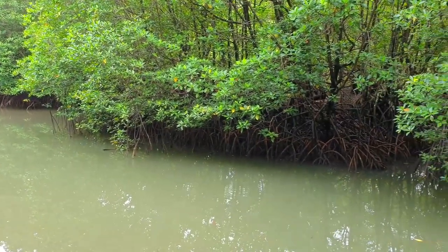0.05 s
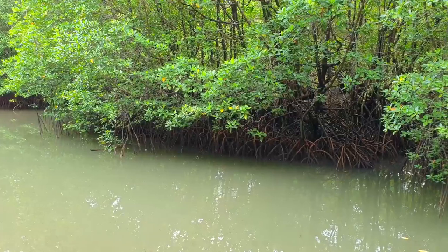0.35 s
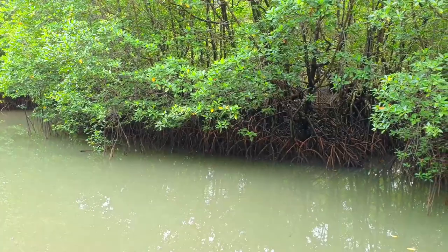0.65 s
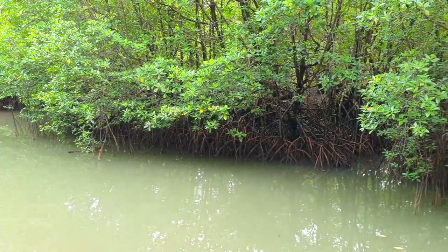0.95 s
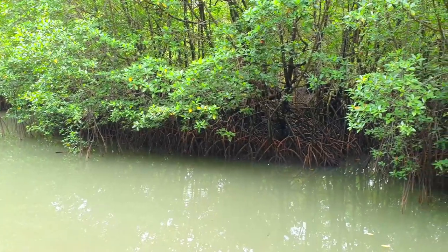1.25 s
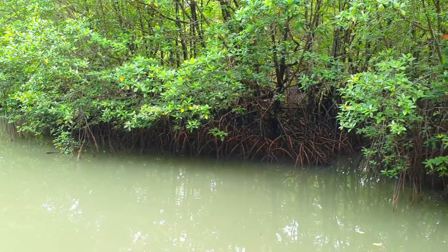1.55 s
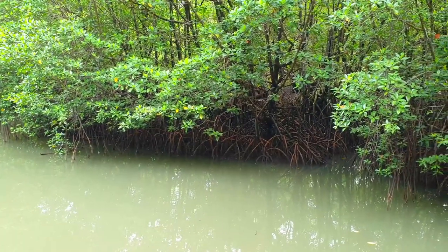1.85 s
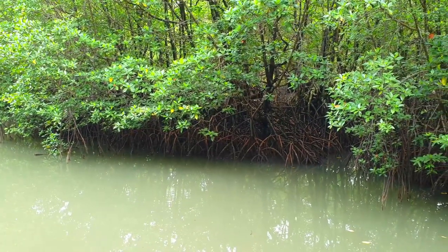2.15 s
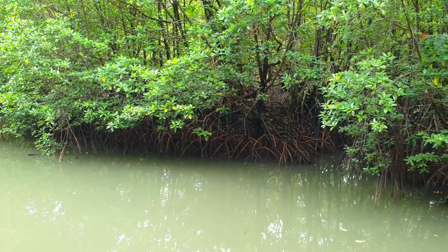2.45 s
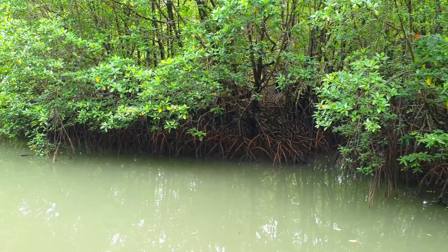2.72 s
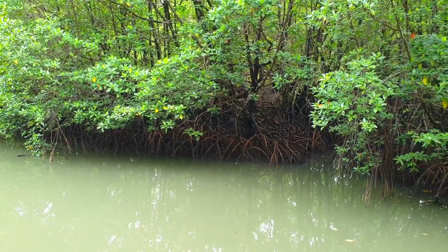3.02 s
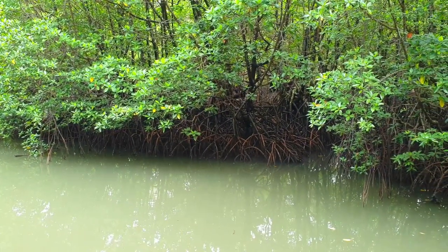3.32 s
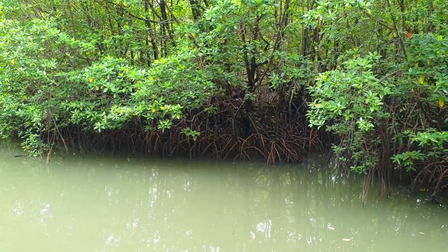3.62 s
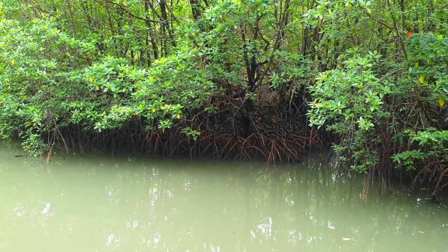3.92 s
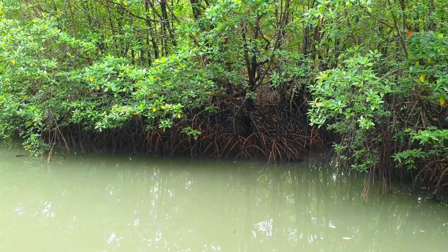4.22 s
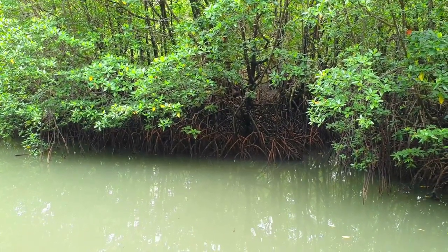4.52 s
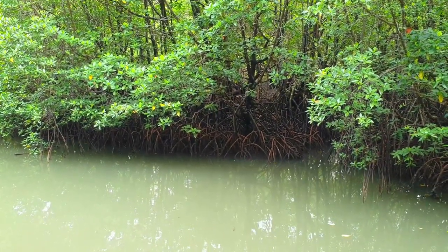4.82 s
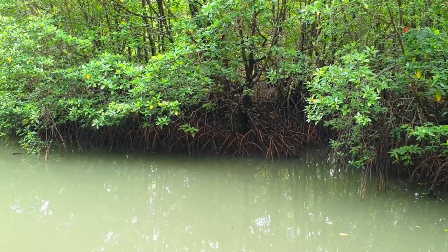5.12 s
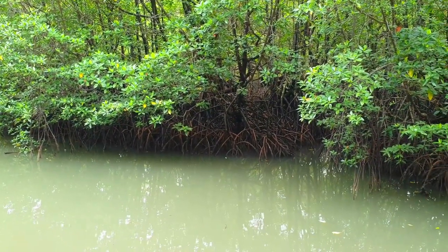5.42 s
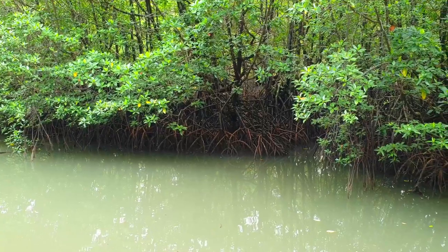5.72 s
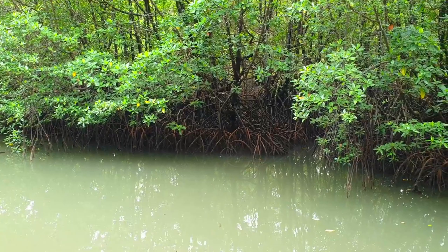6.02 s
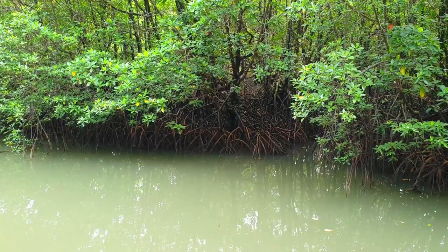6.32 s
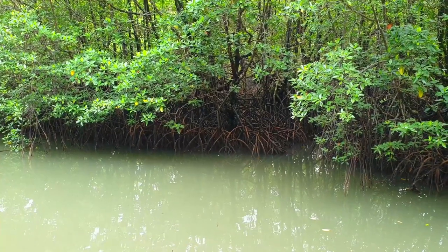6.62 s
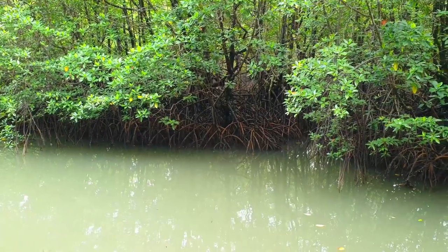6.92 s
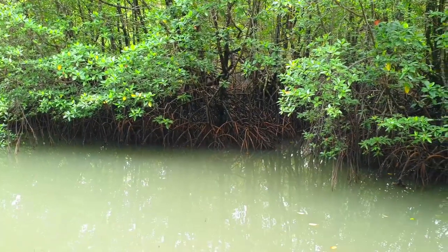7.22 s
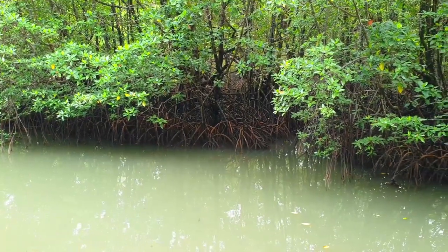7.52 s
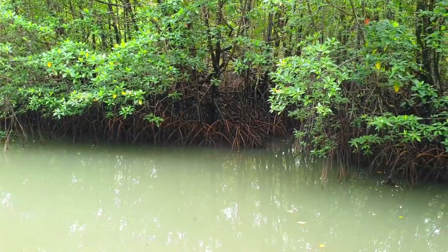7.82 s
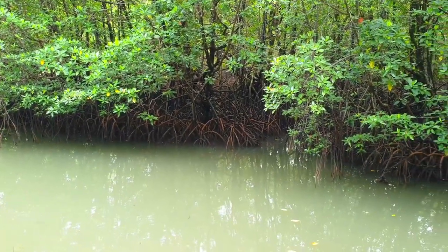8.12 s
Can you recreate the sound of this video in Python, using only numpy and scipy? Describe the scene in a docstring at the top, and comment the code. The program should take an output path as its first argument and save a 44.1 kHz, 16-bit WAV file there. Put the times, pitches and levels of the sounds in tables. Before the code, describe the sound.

A shrill, unbroken cicada buzz fills a mangrove forest over a faint far-off engine rumble and one soft wooden knock.

```python
"""Cicadas drone in a mangrove forest beside a still creek. Each one clicks a small drum skin (its tymbal)
so fast that its hollow belly rings, and the trees scatter the sound. Five sing nearby over a far chorus.
Underneath, a distant engine gathers speed and the forest air murmurs. Wood knocks softly once, the water
plops once, something rustles twice, and two thin whistles sound far away near the end."""
import sys
import numpy as np
from scipy import signal
from scipy.fft import rfft, irfft, next_fast_len
from scipy.io import wavfile
from scipy.ndimage import map_coordinates

SR = 44100
rng = np.random.default_rng(int(sys.argv[2]) if len(sys.argv) > 2 else 0)


def persist_wave(psi):
    """Save psi, clipped to +-1, as 16-bit WAV."""
    counts = np.round(np.clip(psi, -1, 1) * 32767).astype(np.int16)
    wavfile.write(sys.argv[1], SR, np.atleast_2d(counts).T)


N = 368235
TIME = np.arange(N) / SR


def amp(db):
    """Turn decibels into a gain."""
    return np.exp(np.asarray(db) * np.log(10) / 20)


def unit(x):
    """Scale a sound to an average strength (rms) of 1."""
    return x / np.sqrt(np.mean(x ** 2) + 1e-20)


def along(points, hz):
    """Read a table by frequency, on a log scale."""
    f, values = np.transpose(points)
    return np.interp(np.log(hz + 1), np.log(f + 1), values)


def curves(rows):
    """Read a table by time: one value per sample for each later column."""
    times, *columns = np.transpose(rows)
    return [np.interp(TIME, times, column) for column in columns]


def wobble(rate):
    """A smooth curve through rate random values a second."""
    return map_coordinates(rng.standard_normal(int(N * rate / SR) + 4), [TIME * rate])


def filtered(x, response):
    """Multiply each frequency in x by response(hz)."""
    size = next_fast_len(N + SR // 2)
    return irfft(rfft(x, size) * response(np.fft.rfftfreq(size, 1 / SR)), size)[..., :N]


def panned(x, left_db):
    """Make the left side left_db louder than the right."""
    return x * amp(np.array([[left_db], [-left_db]]) / 2)


# how alike the two ears hear the noise: f/Hz, likeness (1 = the same)
EAR_LIKENESS = [(60, 0.71), (130, 0.91), (290, 0.8), (640, 0.68), (1400, -0.38), (3000, 0.018)]

def rush(spectrum):
    """Noise from all around: alike in both ears in the bass, unrelated in the treble."""
    def response(hz):
        angle = np.arccos(np.clip(along(EAR_LIKENESS, hz), -1, 1)) / 2
        return amp(along(spectrum, hz)) * [np.cos(angle), np.sin(angle)]
    mid, side = filtered(rng.standard_normal((2, N)), response)
    return unit(np.array([mid + side, mid - side]))


def clicks(cycles, uneven_db, reach=8):
    """The drum skin snaps once per cycle, each click a slightly different size."""
    at = np.interp(np.arange(np.ceil(cycles[0]), cycles[-1]), cycles, np.arange(N))
    taps = at.astype(int)[:, None] + np.arange(1 - reach, reach + 1)
    offset = taps - at[:, None]
    size = amp(uneven_db * rng.uniform(-1.07, 1, (len(at), 1)))
    shapes = size * np.sinc(offset) * np.sinc(offset / reach)  # lets a click fall between samples
    return np.bincount(np.clip(taps, 0, N - 1).ravel(), shapes.ravel(), N)


# how strongly a cicada's belly rings: f/Hz, relative level/dB
BELLY_RING = [(2350, -48.5), (4000, -42), (4620, -45.5), (4750, -33), (5060, -19.5), (5290, -10),
              (5920, 2.5), (6730, -9), (6950, -14.5), (7570, -20.5), (8790, -28.5), (9840, -27.5),
              (11000, -38.5), (12300, -32.5), (13200, -58), (14400, -48)]

def belly(pulses, shift_hz):
    """Clicks ring the hollow belly; a smaller insect rings higher."""
    return filtered(pulses, lambda hz: amp(along(BELLY_RING, np.abs(hz - shift_hz))))


def forest(x, lag_ms, echo_db, fade_s=0.37):
    """Direct sound, lag_ms late at the left ear, plus echoes that shift as the leaves sway."""
    t = np.arange(SR // 2) / SR
    tails = rng.standard_normal((4, len(t))) * amp(-60 * t / fade_s)
    padded = np.pad(x, (len(t) - 1, 0), mode="reflect")
    paths = signal.fftconvolve(padded[None], tails, "valid", axes=1)
    sway = wobble(1.3)
    echoes = np.cos(sway) * paths[:2] + np.sin(sway) * paths[2:]
    direct = filtered(x, lambda hz: np.exp(np.pi * hz * lag_ms / 1000 * np.array([[-1j], [1j]])))
    return unit(unit(direct) + amp(echo_db) * unit(echoes))


def buzzer(pace, db, shift_hz, throb_hz, throb_db, swing, jitter, lag_ms, echo_db):
    """A cicada whose fast clicks swell and hurry with each uneven throb of its muscles."""
    beat = 2 * np.pi * np.cumsum(throb_hz * (1 + 0.035 * wobble(8))) / SR
    squeeze = np.sin(beat) + 0.5 * np.sin(2 * beat)  # lopsided: one stroke is quicker than the other
    throb = squeeze * (1 + 0.28 * np.tanh(wobble(20)))
    hurry = 1 + swing * throb + jitter * wobble(90) + 0.0008 * wobble(4)
    pulses = clicks(np.cumsum(pace * hurry) / SR, uneven_db=6) * amp(throb_db * throb)
    return amp(db) * forest(belly(pulses, shift_hz), lag_ms, echo_db)


def rattler(pace, rebound, shift_hz, lag_ms, echo_db):
    """A slower, very even cicada: its drum skin pops in, then back out half a cycle later."""
    cycles = np.cumsum(pace * (1 + 0.0004 * wobble(25))) / SR
    pulses = clicks(cycles, uneven_db=0.5) - rebound * clicks(cycles + 0.5, uneven_db=1.5)
    return forest(belly(pulses, shift_hz), lag_ms, echo_db)


# the leading cicada's song: t/s, pace/(clicks per s), relative level/dB
LEADER_SONG = [(0, 597, -28), (1.3, 599, -26.5), (2.1, 595, -23.5), (3.1, 593, -24), (4.6, 590, -23),
               (5.8, 588, -24.5), (7, 587.8, -27), (8.35, 587.6, -27.5)]

def leading_cicada():
    """The main singer, whose clicks gradually slow down."""
    pace, db = curves(LEADER_SONG)
    return buzzer(pace, db, shift_hz=0, throb_hz=22.23, throb_db=3,
                  swing=0.002, jitter=0.001104, lag_ms=0.28, echo_db=1.5)


# its companion's song: t/s, pace/(clicks per s), relative level/dB
COMPANION_SONG = [(0, 600, -28.5), (1.4, 602, -26), (2.5, 604, -29), (4.2, 604, -30), (5.3, 602, -31),
                  (6.3, 602.5, -28), (6.9, 600, -30.5), (8.35, 602, -29)]

def companion_cicada():
    """Sings almost in step with the leader, so the two pulse against each other."""
    pace, db = curves(COMPANION_SONG)
    return buzzer(pace, db - 1.5, shift_hz=232, throb_hz=21.96, throb_db=2,
                  swing=0.0022, jitter=0.001, lag_ms=0.28, echo_db=4)


def deep_cicada(hold_s=0.35, fade_db_per_s=2.8):
    """A deeper singer that tires: it slows steadily and fades."""
    pace = 548 - 2.3 * TIME
    db = -24 - fade_db_per_s * np.maximum(TIME - hold_s, 0)
    return buzzer(pace, db, shift_hz=-270, throb_hz=20.55, throb_db=3,
                  swing=0.0036, jitter=0.001595, lag_ms=0.347, echo_db=6)


# the restless cicada's song: t/s, pace/(clicks per s), relative level/dB
RESTLESS_SONG = [(0, 447, -3), (1.1, 452, 1), (1.95, 455, 1), (2.2, 440, 2), (2.9, 442, 2), (3.8, 449, -3),
                 (4.7, 455, 1), (4.95, 442, 0), (5.5, 444, -1), (6.2, 462, -3)]

def restless_cicada():
    """Hurries its clicks, drops back and hurries again."""
    pace, db = curves(RESTLESS_SONG)
    return buzzer(pace, db - 27.5, shift_hz=90, throb_hz=23.2, throb_db=2.5,
                  swing=0.0038, jitter=0.001, lag_ms=-0.064, echo_db=1)


def shy_cicada(full_song_s=6.25):
    """Rattles quietly at first, then jumps into full song."""
    db = np.where(TIME > full_song_s, -24, -35.5)
    return amp(db) * rattler(pace=147, rebound=0.5, shift_hz=88, lag_ms=0.048, echo_db=6)


# the far chorus's loudness: t/s, relative level/dB
CHORUS_SWELL = [(0, -23.5), (1, -27), (3, -24), (5.3, -22.5), (7, -22.5), (8.35, -24)]

def far_chorus():
    """Countless far cicadas blend into a hiss; three stand out faintly."""
    db, = curves(CHORUS_SWELL)
    singers = 0
    for pace in rng.uniform(128, 165, 3):
        gain = amp(0.6 * wobble(0.76))
        drift = 1 + 0.000994 * wobble(0.6)
        singers += gain * rattler(pace * drift, rebound=0.75, shift_hz=0, lag_ms=0, echo_db=5)
    return amp(db + 0.26 * wobble(14)) * unit(rush(BELLY_RING) + amp(-5) * unit(singers))


# loudness of the engine's lowest note: t/s, level/dB
ENGINE_SWELL = [(0, -39.5), (0.49, -36.5), (0.79, -46), (1.1, -38.5), (1.91, -35.5), (2.11, -51),
                (2.4, -45), (2.65, -35.5), (2.79, -46), (2.91, -35.5), (3.32, -49.5), (3.77, -41.5),
                (5.2, -33.5), (5.95, -34.5), (6.44, -50.5), (7.35, -52), (7.91, -40), (8.35, -49)]
# tone of its rumble: f/Hz, relative level/dB
RUMBLE_TONE = [(13, -37), (22, 0), (48, 0.5), (75, 2), (130, -3.5), (220, -18.5), (260, -15), (340, -39),
               (570, -120)]

def engine(start_hz=51.8, top_hz=65, top_speed_s=6.7, boom_hz=188, flutter_db=2.2):
    """A far engine fires ever faster, then holds: a low note, two overtones and a dull rumble."""
    firing_hz = np.interp(TIME, [0, top_speed_s], [start_hz, top_hz])
    level_db, = curves(ENGINE_SWELL)
    swell_db = level_db - level_db.mean()
    ease_db = 8 * np.maximum(TIME - top_speed_s, 0)  # the overtones die away at top speed
    overtone_db = level_db.mean() + 0.3 * swell_db - ease_db
    boom_db = 10 / (1 + ((3 * firing_hz - boom_hz) / 9) ** 2)  # the top note booms as it passes boom_hz
    levels = [level_db, overtone_db - 7, overtone_db - 19.5 + boom_db]
    phase = 2 * np.pi * np.cumsum(firing_hz * (1 + 0.0052 * wobble(14))) / SR
    notes = sum(np.sqrt(2) * amp(db + flutter_db * wobble(14)) * np.sin(k * phase)
                for k, db in enumerate(levels, 1))
    rumble = amp(-39.5 + 0.17 * swell_db) * rush(RUMBLE_TONE)
    return panned(notes + rumble, left_db=-3)


# tone of the forest air: f/Hz, relative level/dB
AIR_TONE = [(120, -18), (200, -2), (222, -9.5), (325, -4), (445, -2.5), (618, -2), (772, -7.5),
            (1360, -6.5), (2070, -6.5), (2650, -11), (3020, -20), (3930, -25), (4600, -13), (5980, -46),
            (10100, -120)]
# faint far whines: f/Hz, level/dB, waver/Hz
WHINES = [(441, -62, 2), (2080, -65, 70)]

def air():
    """The soft murmur of the forest, with faint wavering whines in it."""
    out = amp(-43 + 0.089 * wobble(3.9)) * rush(AIR_TONE)
    for hz, db, waver_hz in WHINES:
        phase = 2 * np.pi * np.cumsum(hz + waver_hz * wobble(120)) / SR
        out += np.sqrt(2) * amp(db + 1.5 * wobble(5)) * np.sin(phase)
    return panned(out, left_db=-1)


# the knock: t/s, relative level/dB
WOOD_KNOCKS = [(2.862, -27)]
# the notes the wood rings with: f/Hz, relative level/dB, time to fade by 60 dB/s
WOOD_NOTES = [(257, 5, 0.046), (560, 4, 0.06), (744, -6, .05), (890, -4, 0.06)]

def knock(thud_fade_s=0.067):
    """A light knock on wood: a dull thud and a short ring."""
    thud_tone = [(100, -15), (220, -4), (900, -2), (1500, -30)]  # f/Hz, relative level/dB
    out = np.zeros((2, N))
    for start, db in WOOD_KNOCKS:
        t = np.maximum(TIME - start, 0)
        ring = sum(amp(level - 60 * t / fade_s) * np.sin(2 * np.pi * hz * t)
                   for hz, level, fade_s in WOOD_NOTES)
        thud = (t > 0) * amp(-60 * t / thud_fade_s) * rush(thud_tone)
        out += amp(db - 11) * (ring + thud)
    return out


# bubbles in the plop: t/s, starting f/Hz, level/dB
BUBBLES = [(4.019, 1330, -38), (4.021, 1020, -39), (4.031, 1136, -33), (4.158, 1800, -37)]
# tone of the ripples: f/Hz, relative level/dB
RIPPLE_TONE = [(500, -40), (950, -6), (1200, -2), (1450, -6), (1800, -16), (2900, -12), (4000, -40)]

def plop(splash_s=4.02, ripple_fade_s=0.97, rise_s=0.0011, bubble_fade_s=0.041, climb_per_s=0.84):
    """Something small breaks the water's surface: a few bubbles ring, then ripples die away."""
    t = TIME - splash_s
    out = (t > 0) * amp(-40.5 - 60 * np.abs(t) / ripple_fade_s) * rush(RIPPLE_TONE)
    for start, hz, db in BUBBLES:
        t = np.maximum(TIME - start, 0)
        loudness = amp(db - 60 * t / bubble_fade_s) * (1 - np.exp(-t / rise_s))
        out += loudness * np.sin(2 * np.pi * hz * t * (1 + climb_per_s * t / 2))
    return out


# soft brushings: t/s, rise/s, hold/s, time to fade by 60 dB/s, level/dB
BRUSHINGS = [(6.1, 0.042, 0.12, 0.65, -40), (8.18, 0.047, 0.2, .4, -40.5)]
# small ticks in them: t/s, level/dB
RUSTLE_TICKS = [(6.146, -43), (8.264, -35)]
# tone of the rustling: f/Hz, relative level/dB
RUSTLE_TONE = [(500, -27), (1100, 4.5), (2200, 3), (3600, 2), (4600, -4), (9000, -14), (14000, -28)]

def rustles(grain_db=2, grains_per_s=220, tick_fade_s=0.025):
    """Soft, grainy brushings, as of leaves, each with a small tick."""
    loudness, ticks = np.zeros(N), np.zeros(N)
    for start, rise_s, hold_s, fade_s, db in BRUSHINGS:
        t = TIME - start
        fade_db = 60 * np.maximum(t - rise_s - hold_s, 0) / fade_s
        loudness += np.clip(t / rise_s, 0, 1) * amp(db - fade_db)
    for start, db in RUSTLE_TICKS:
        t = TIME - start
        ticks += (t > 0) * amp(db - 60 * np.abs(t) / tick_fade_s)
    grain = amp(grain_db * wobble(grains_per_s))
    return (loudness * grain + ticks) * rush(RUSTLE_TONE)


# far whistles: t/s, length/s, f/Hz, level/dB
FAR_WHISTLES = [(6.65, 0.9, 1990, -60), (7.85, 0.7, 2135, -56.5)]

def whistles(fade_s=0.15):
    """Thin whistles from deep in the forest, each holding one note."""
    out = np.zeros(N)
    for start, length_s, hz, db in FAR_WHISTLES:
        t = TIME - start
        fade = np.clip(np.minimum(t, length_s - t) / fade_s, 0, 1)
        phase = 2 * np.pi * np.cumsum(hz + 2 * wobble(20)) / SR
        out += np.sqrt(2) * fade * amp(db + wobble(9.2)) * np.sin(phase)
    return out


def scene():
    """Everything heard from the creek, with the cicadas a little to the right."""
    near = leading_cicada() + companion_cicada() + deep_cicada() + restless_cicada() + shy_cicada()
    cicadas = panned(amp(3) * (near + far_chorus()), left_db=-2.5)
    return cicadas + engine() + air() + knock() + plop() + rustles() + whistles()


def record(dry, lowest_hz=39, highest_hz=14500):
    """Take away the deepest bass and the highest treble."""
    bass_cut = signal.butter(6, lowest_hz, "highpass", fs=SR, output="sos")
    return filtered(signal.sosfilt(bass_cut, dry), lambda hz: hz < highest_hz)


dry = scene()
out = record(dry)
persist_wave(out)
```